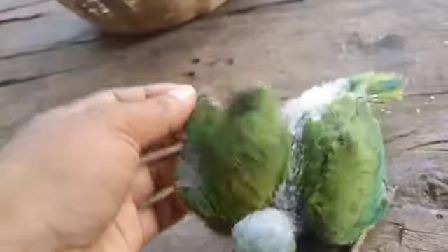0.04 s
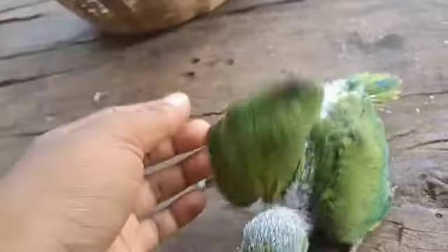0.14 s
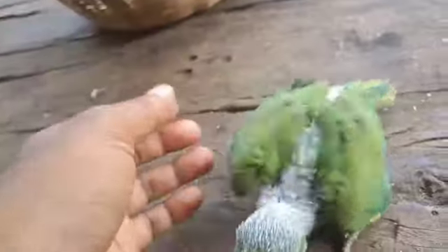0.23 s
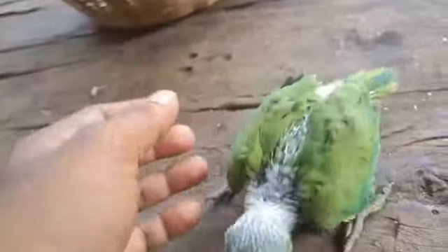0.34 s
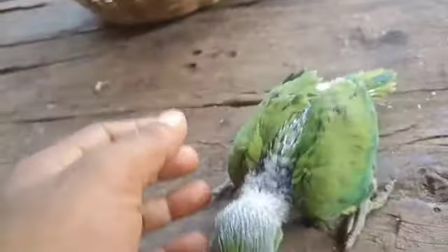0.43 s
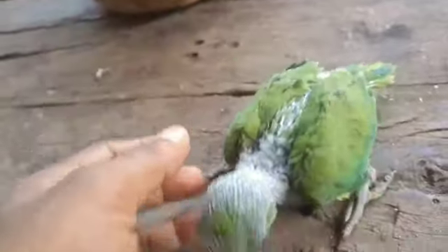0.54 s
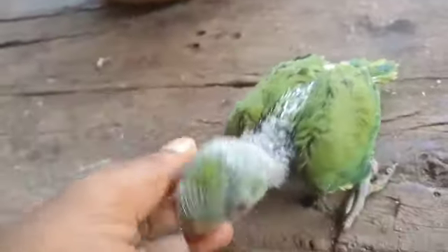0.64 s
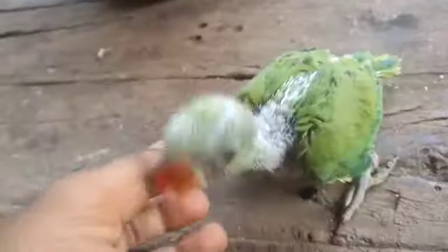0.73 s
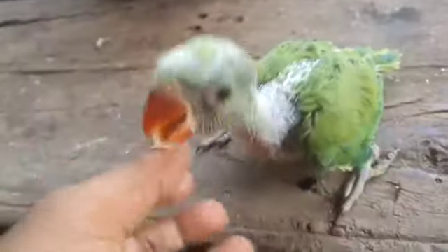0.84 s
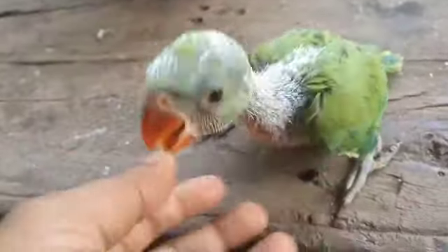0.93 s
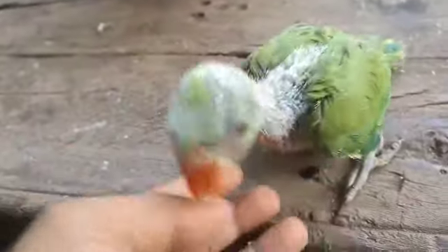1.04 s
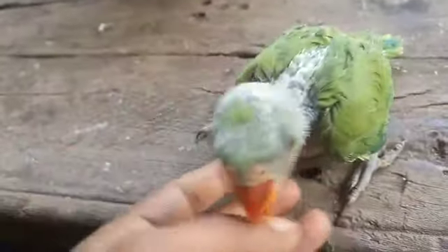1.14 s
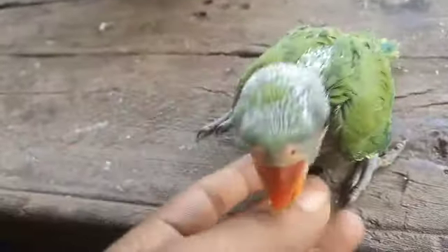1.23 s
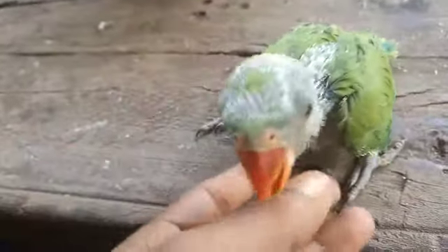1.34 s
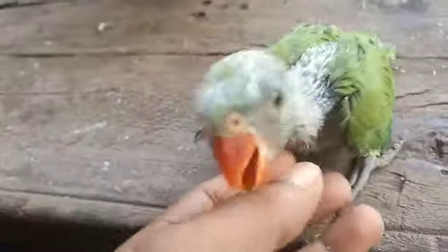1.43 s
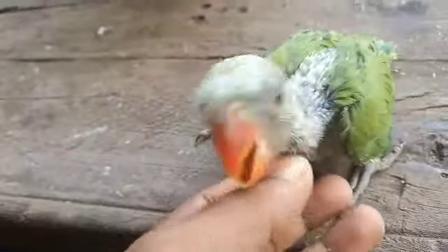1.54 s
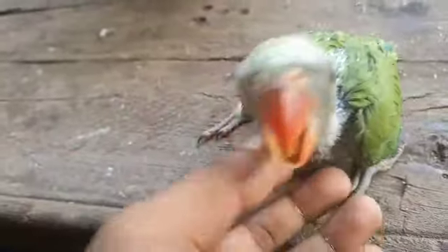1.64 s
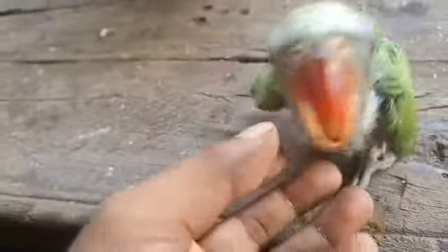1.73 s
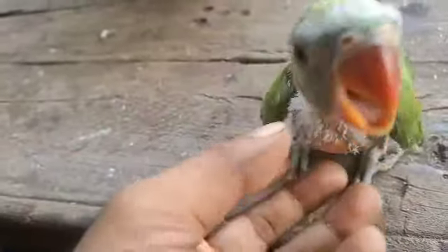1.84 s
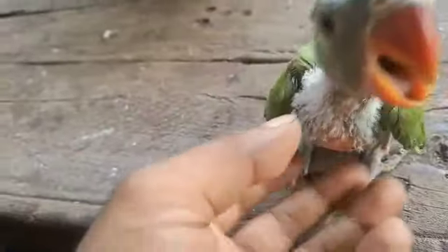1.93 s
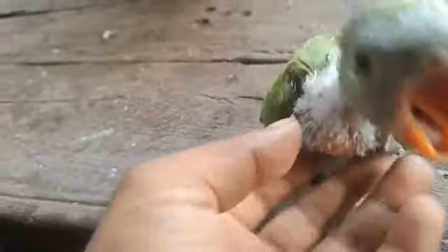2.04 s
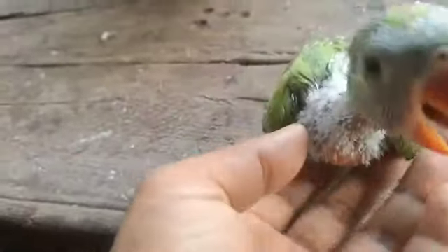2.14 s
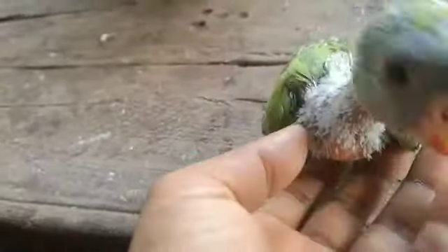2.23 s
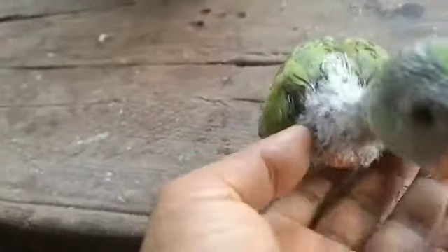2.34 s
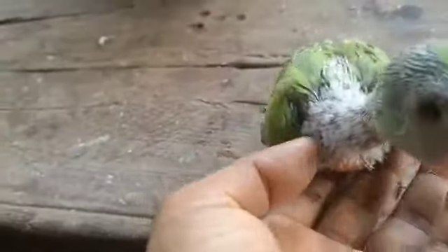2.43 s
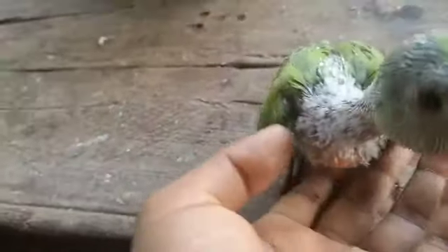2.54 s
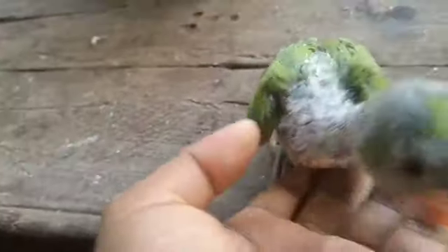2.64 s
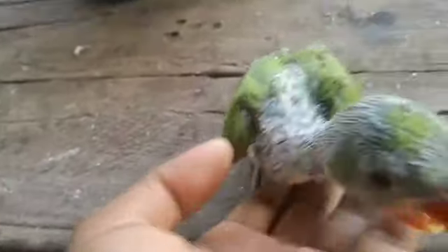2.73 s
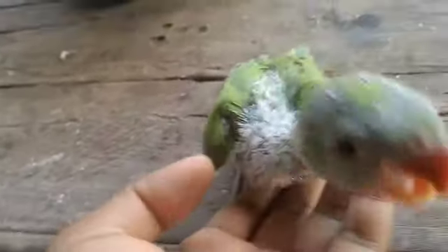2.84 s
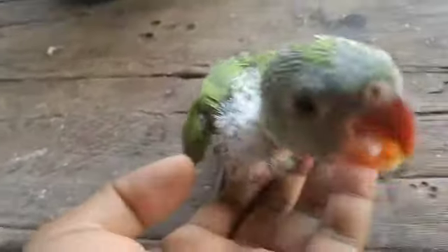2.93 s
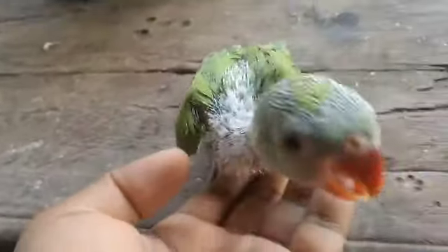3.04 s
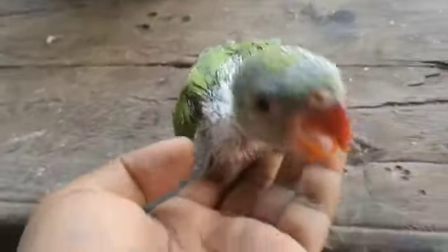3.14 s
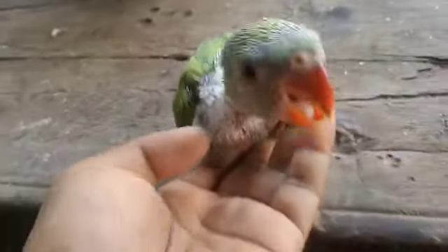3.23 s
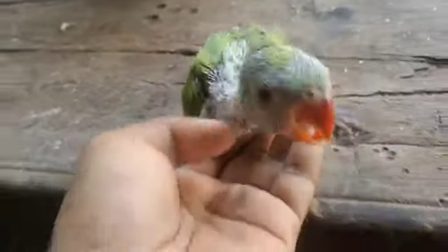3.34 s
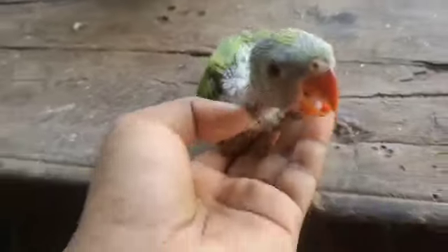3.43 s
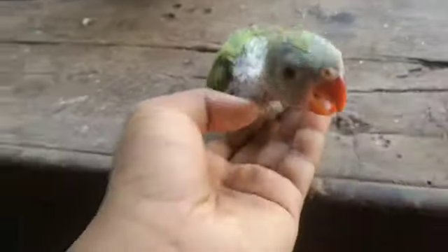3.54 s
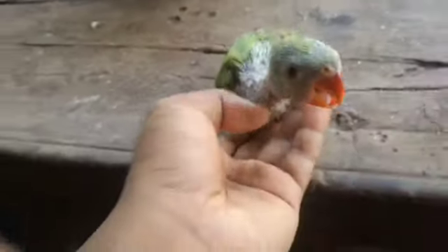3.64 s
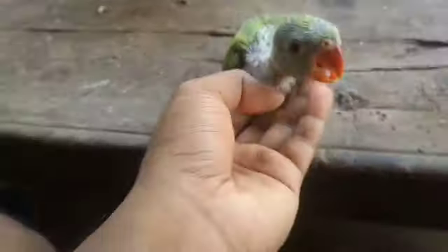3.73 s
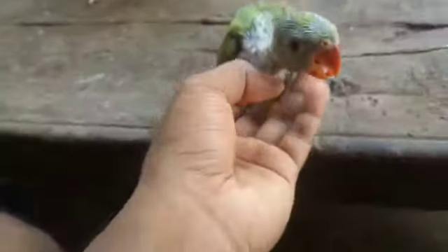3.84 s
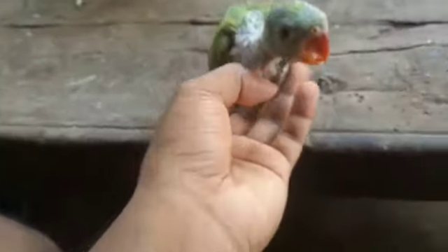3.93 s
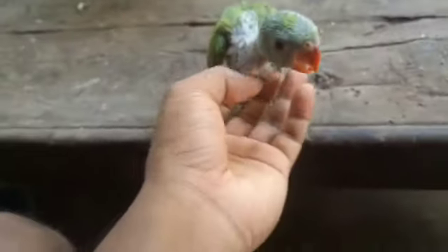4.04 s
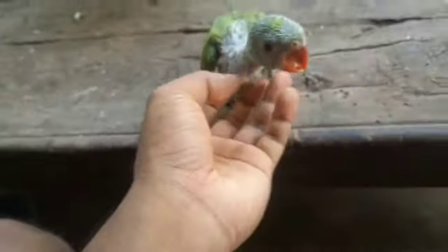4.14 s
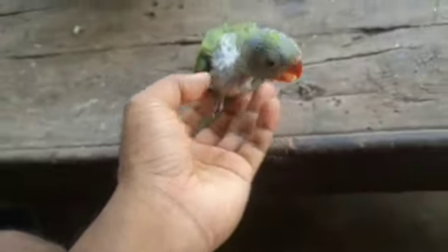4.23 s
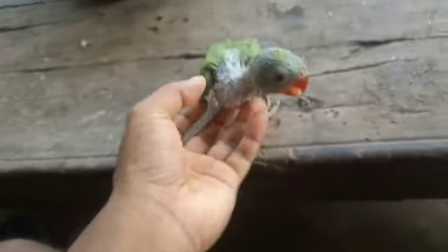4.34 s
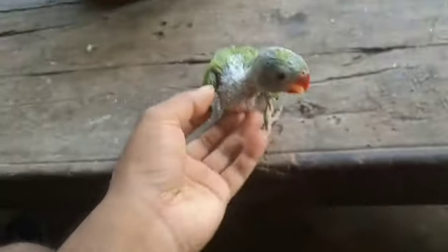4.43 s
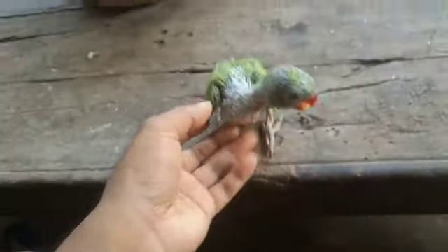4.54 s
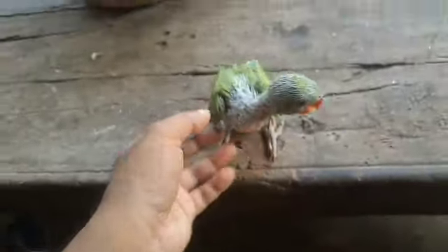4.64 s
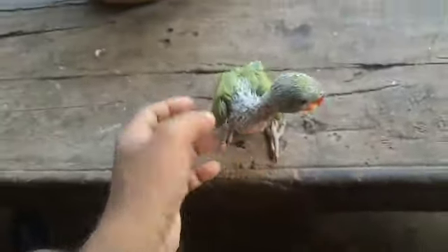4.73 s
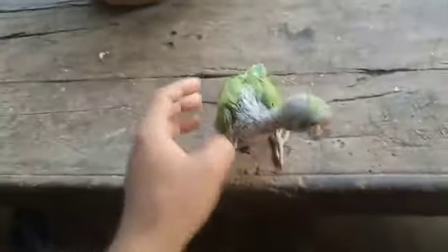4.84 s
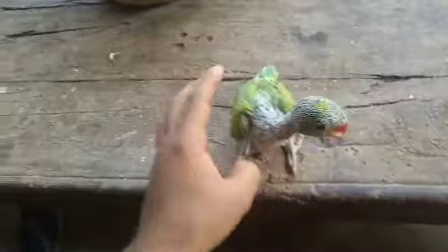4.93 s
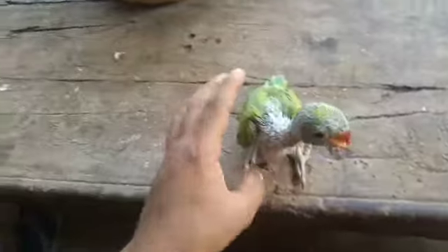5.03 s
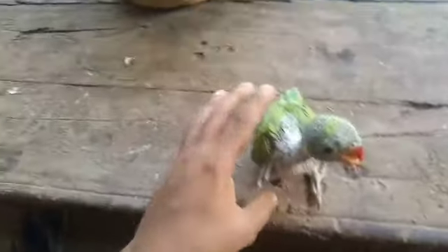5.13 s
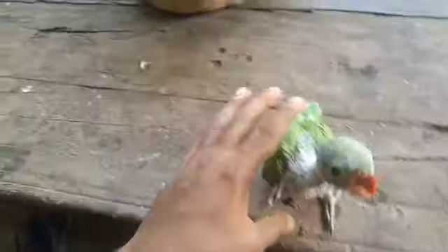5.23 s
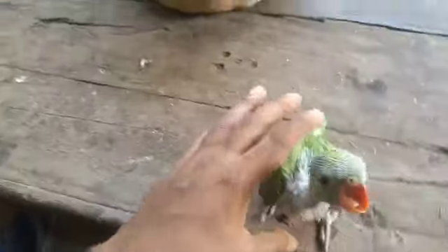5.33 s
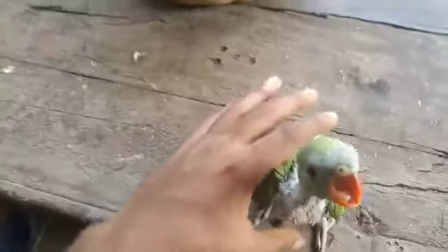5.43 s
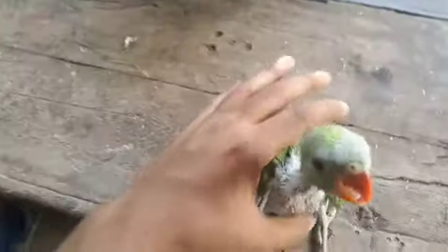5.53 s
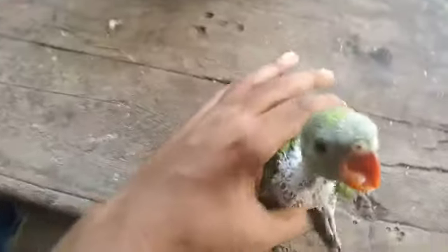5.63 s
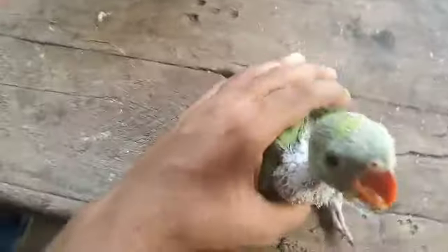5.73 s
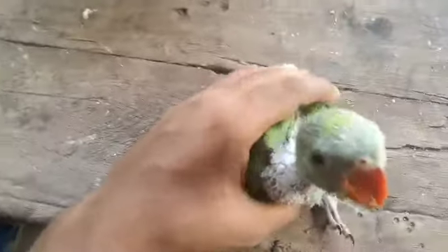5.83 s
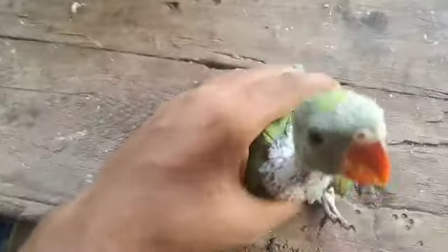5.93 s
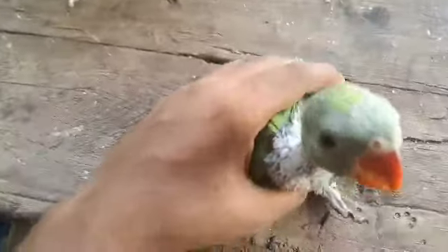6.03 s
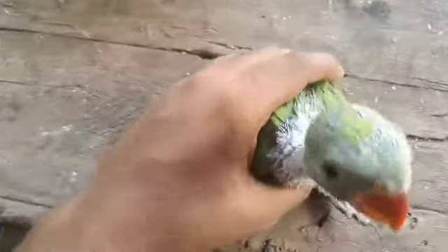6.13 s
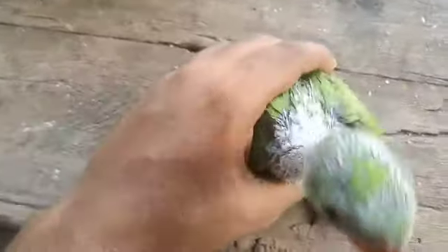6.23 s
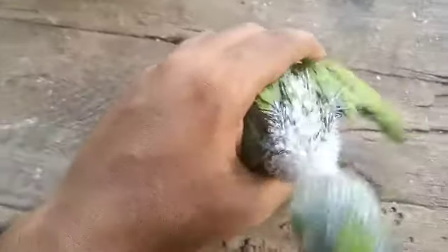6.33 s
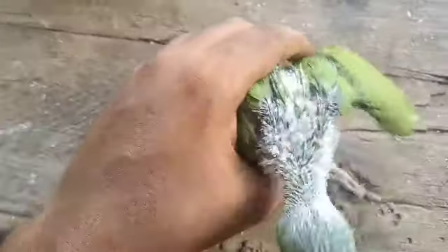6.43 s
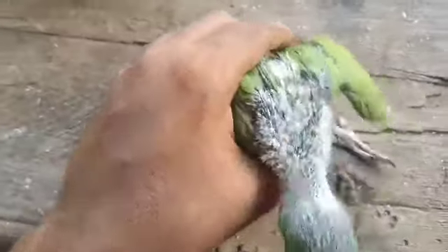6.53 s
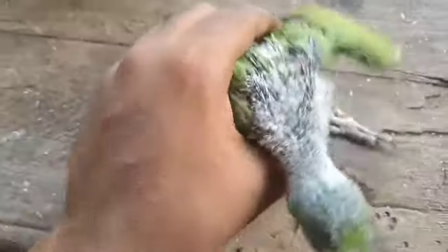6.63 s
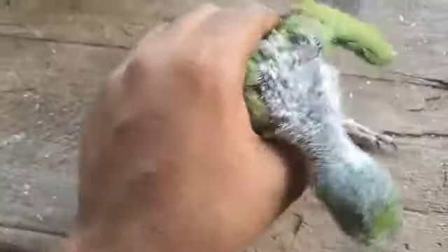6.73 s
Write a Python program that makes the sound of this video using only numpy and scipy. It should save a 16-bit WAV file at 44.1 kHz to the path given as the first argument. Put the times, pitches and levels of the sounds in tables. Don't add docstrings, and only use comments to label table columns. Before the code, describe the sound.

A quiet room with soft, slightly swelling air noise, very faint low mains hum and a distant thin insect hiss. At about 0.2 s a hand brushes feathers, a short dry rustle. At 0.67 s a tiny creak leads into a parrot chick's begging: short, harsh, reedy squawks of about 0.06 s, evenly spaced near eight per second, each arching quickly up to around 1.2 kHz and down again, with bright raspy overtones. They lean left and close, growing strongest around 2 to 3.3 s. From 3.5 s they recede, becoming weaker, hoarser and roomier through 5.1 s, slightly slower, then swell again, fuller and a little lower, until the last at 5.75 s. Short reflections from table and walls colour them. In the quiet after, faint dry claw ticks on wood cluster at 6.0 to 6.3 s, the last clearest; at 6.55 to 6.8 s feathers rustle with a slight breathy squeak.

```python
import sys
import numpy as np
from scipy import signal
from scipy.fft import rfft, irfft, next_fast_len
from scipy.io import wavfile
from scipy.ndimage import uniform_filter1d

SR = 44100
rng = np.random.default_rng(int(sys.argv[2]) if len(sys.argv) > 2 else 0)


def nominal_scale(level):
    x = np.asarray(level, float) / 20
    return 10 ** x


def generate_wav(sig):
    pcm = np.round(np.clip(np.atleast_2d(sig).T, -1, 1) * 32767).astype(np.int16)
    wavfile.write(sys.argv[1], SR, pcm)


N = 298557

# (time [s], length [s], top pitch [Hz], level [dB], beak towards ports [dB])
SQUAWKS = [(0.677, 0.066, 1313, -39, -5), (0.7982, 0.063, 1267, -36.5, 0.5),
           (0.9205, 0.06, 1223, -37, -4.5), (1.0455, 0.059, 1207, -36.5, -5),
           (1.168, 0.062, 1236, -36.5, -0.2), (1.2944, 0.058, 1239, -35.5, 1.3),
           (1.4123, 0.061, 1250, -35.5, 1), (1.5343, 0.063, 1230, -35, 0.3),
           (1.6589, 0.063, 1239, -35.5, 0), (1.7863, 0.064, 1209, -33.5, -4.5),
           (1.9118, 0.063, 1181, -33.5, -3), (2.0412, 0.061, 1176, -33, -3),
           (2.1697, 0.061, 1188, -32, -5.5), (2.2948, .0596, 1180, -32.5, -8),
           (2.426, 0.063, 1228, -32.5, -6), (2.554, 0.065, 1214, -32.5, -6.5),
           (2.685, 0.062, 1218, -33.5, -9), (2.8097, 0.063, 1267, -33.5, -5.5),
           (2.936, 0.06, 1254, -33.5, -4.5), (3.061, 0.064, 1233, -32.5, -5.5),
           (3.193, 0.064, 1251, -33, -3.5), (3.3227, .0624, 1245, -33.5, -3.5),
               (3.45, 0.062, 1260, -35.5, -4.5), (3.577, 0.061, 1260, -36.5, -5),
               (3.7078, .0616, 1266, -38, -4.5), (3.8393, 0.056, 1263, -38.5, -9.5),
               (3.9618, 0.057, 1276, -40.5, -7), (4.083, 0.057, 1190, -40.5, -5.5),
               (4.2094, .0589, 1290, -41, -4), (4.3395, .062, 1287, -42, -5.5),
               (4.4747, 0.066, 1286, -42.5, -19), (4.611, 0.068, 1307, -42, -11),
               (4.7478, 0.068, 1354, -43.5, -10.5), (4.8786, .0734, 1263, -42.5, -10.5),
               (5.0232, 0.069, 1293, -43.5, -5), (5.16, 0.062, 1227, -42, -9),
               (5.2968, 0.066, 1206, -39, -5.5), (5.4514, 0.066, 1208, -38.5, -6),
               (5.585, 0.07, 1176, -36.5, -5.5), (5.7474, 0.07, 1150, -36, -9.5)]
# (time [s], hoarseness [0-1], curvature of pitch fall [exponent], place of top [0-1],
# first pitch [Hz], last pitch [Hz])
VOICE_STATE = [(.68, .15, 2.6, .32, 900, 640), (.8, .45, 1.45, .49, 480, 640),
               (1.8, .3, 1.45, .41, 500, 570), (3.2, .52, 1.45, .38, 500, 560),
               (3.85, .6, 1.45, .365, 600, 570), (4.3, .88, 1.45, .34, 540, 570),
               (5.1, .92, 1.45, .325, 530, 570), (5.4, .45, 1.45, .39, 520, 560),
               (5.75, .3, 1.45, .37, 510, 550)]
# (time [s], left-right [dB], right lag [ms], neck strain [dB], gape [dB])
HEAD_MOTION = [(.68, 7, 0.17, -2.5, -5.5), (.8, 6, .18, 0, -1.5), (.92, 9, 0.25, 1.5, 3),
               (1.3, 7, .2, 0.7, 3.5), (1.5, 6.5, 0.21, -1, 3.5), (1.72, 7.5, 0.25, -1.8, 4),
               (1.92, 5, 0.19, -3, -0.5), (2.3, 3, .15, -3, 1), (2.68, 5.5, 0.082, -3.5, -0.8),
               (2.85, 4, 0.13, 0, -3), (3.3, 4, .21, 1.1, -1.4), (3.7, 5.3, 0.19, 3.5, -3.4),
               (3.95, 3.9, .23, 4, 0), (4.15, 2.2, 0.17, 5, -2.9), (4.6, -1.1, 0.23, 3.5, -4.2),
               (5.14, 1.3, .16, 4.5, -0.5), (5.45, 2.4, 0.082, -4.5, 7), (5.75, 3, .09, -8.5, 3.5)]
# (time [s], lowest throat resonance [Hz], its level [dB], highest throat resonance level [dB])
TONGUE_MOTION = [(.7, 3770, -2, -9), (1.0, 3680, -1, -9), (1.3, 3630, -9, -9), (1.7, 3560, -1.5, -8.5),
                 (2.2, 3420, 3, -10), (3.1, 3590, -3, -10), (3.8, 3810, -0.5, -8.5), (4.4, 3980, -0.5, -5),
                 (4.9, 3610, 2.5, -4.5), (5.3, 3340, 1.5, -14), (5.45, 3440, -3.5, -14),
                 (5.75, 3420, 1.5, -9)]
# (place [0-1], level [dB])
BREATH_EFFORT = [(0, -4), (.05, -5), (.2, -3.5), (.4, 0), (.6, -1.5), (.9, -2.5), (1, -3)]
PART_EFFORT_SHARE = [1.42, 0.17, 1.47, 3.18]
PART_LEVEL_DB = [-2.25, 3.5, 2.78, -0.3]
PART_PAN_DB = [.6, -1.5, -2.2, -1.2]
PART_LAG_SHARE = [0.34, 1.075, 1.231, 1.438]
TRACT_CUT_HZ = [1400, 2700, 6000]
# (resonance [Hz], width [Hz], level [dB])
WINDPIPE_MODES = [(1330, 386, 0), (1793, 357, 1.5), (2317, 517, 4.5)]
# (resonance [Hz], width [Hz], level [dB])
THROAT_MODES = [(3680, 347, 2), (4080, 525, -2), (5510, 715, -6), (6190, 685, -11.5)]
# (resonance [Hz], width [Hz], level [dB])
BEAK_MODES = [(7230, 1000, 0.5), (9930, 970, 3), (10690, 830, 0), (13900, 1860, -4)]
# (time [s], level [dB])
CREAK_PULSES = [(0.666, -34), (.67, -34), (0.6732, -27)]
# (delay [ms], level [dB])
NEAR_ECHOES = [(.5, -14), (1.3, -13), (2.4, -16), (4.6, -19), (7.3, -20), (10.9, -21), (15.4, -23),
               (21, -25)]
# (time [s], level [dB])
ROOM_GAIN = [(.7, 0.5), (1.5, -4.5), (2.5, -1.5), (3.5, -2), (4.3, 4.5), (5.1, 5.5), (5.8, 1)]
# (start [s], loudest at [s], end [s], peak level [dB])
FEATHER_STROKES = [
    (0.167, 0.252, 0.43, -52.5),
    (6.546, 6.606, 6.8, -56),
]
# (frequency [Hz], density [dB per Hz])
FEATHER_SPECTRUM = [(590, -46), (1000, -22), (1380, -12), (1730, -14), (2080, -5.5), (10500, -14.5),
                    (15500, -17)]
# (resonance [Hz], width [Hz], level [dB])
WHEEZE_MODES = [(1750, 250, 0), (2890, 200, -7)]
# (time [s], level [dB])
WHEEZE_LEVEL = [(6.56, -100), (6.6, -58), (6.72, -61), (6.77, -72)]
# (time [s], peak level [dB])
CLAW_TICKS = [(6.03, -54), (6.155, -54), (6.187, -50), (6.212, -53), (6.228, -49), (6.293, -43)]
# (frequency [Hz], density [dB per Hz])
AIR_SPECTRUM = [(12, -44), (20, -17), (48, -0.5), (77, -3.5), (172, 0), (347, -3), (434, -12.5),
                (574, -6.5), (1440, -16.5), (1660, -12), (5080, -22.5), (6010, -22), (6720, -21),
                (14700, -25.5), (16000, -50)]
# (time [s], level [dB])
AIR_SWELL = [(0.0, -65.5), (1.11, -63), (1.94, -62), (2.39, -59.5), (3.86, -61.5), (4.15, -60), (4.73, -62),
             (5.62, -59), (6.45, -65.5), (6.77, -63)]
# (frequency [Hz], left-right likeness [-1 to 1])
PORT_LIKENESS = [(60, 0.66), (180, 0.96), (550, 0.69), (1650, 0.12), (4970, 0.33), (15000, 0.055)]
# (frequency [Hz], left-right balance [dB])
PORT_BALANCE = [(60, 4.5), (180, 1.5), (550, 3), (1650, -2.5), (4970, -5.5), (15000, -1.5)]
# (resonance [Hz], width [Hz], level [dB])
INSECT_MODES = [(5850, 500, 0)]
# (frequency [Hz], level [dB rms])
HUM_LINES = [(100, -68.5), (200, -76)]

LOWEST_HZ = 550
PUSH_DB, PUSH_PER_STRAIN = 1.24, 0.89
EVEN_PER_STRAIN = 0.39
BODY_CUT_HZ = 480
SHADOW_HZ, FACING_DB, SHADOW_SHARE = 11000, -35, .1
ECHO_CUT_HZ = 1600
ROOM_T60_S, ROOM_DB, WALL_CUT_HZ, ROOM_LOW_CUT_HZ = .32, -22, 9000, 1400
STROKE_START_DB, STROKE_FADE_DB_PER_S = -5.5, 73
INSECTS_DB = -74
PORT_CUT_HZ = 12600


def chick():
    out = np.zeros((2, N))
    squawks = SQUAWKS
    sway = np.cumsum(rng.standard_normal((len(squawks), 2, len(NEAR_ECHOES))), axis=0)
    for (start_s, length_s, top_hz, level_db, beak_db), pose in zip(squawks, sway):
        hoarse, curve, crest, first_hz, last_hz = at_time(VOICE_STATE, start_s)
        pan_db, lag_ms, strain_db, gape_db = at_time(HEAD_MOTION, start_s)
        tongue_hz, low_db, high_db = at_time(TONGUE_MOTION, start_s)
        lowest = (tongue_hz, THROAT_MODES[0][1], low_db)
        highest = (*THROAT_MODES[3][:2], high_db)
        throat = [lowest, *THROAT_MODES[1:3], highest]
        parts_db = PART_LEVEL_DB + np.array([0, strain_db, gape_db, beak_db]) + level_db
        parts = squawk(length_s, first_hz, top_hz, crest, last_hz, hoarse, curve, strain_db, throat)

        size = next_fast_len(parts.shape[1] + 1200)
        at = round((start_s + .0002) * SR)
        hz = np.arange(size // 2 + 1) * SR / size
        phase_per_ms = -2j * np.pi * hz / 1000
        above = 1 / (1 + (SHADOW_HZ / np.maximum(hz, 1)) ** 16)
        treble = 1 / (1 + (ECHO_CUT_HZ / np.maximum(hz, 1)) ** 4)
        shadow_db = SHADOW_SHARE * min(parts_db[3] - FACING_DB, 0) * above
        spectra = rfft(parts, size) * nominal_scale(shadow_db)
        for port, side in enumerate((1, -1)):
            gains = nominal_scale(parts_db + side * (pan_db + np.array(PART_PAN_DB)) / 2)
            lags_ms = port * lag_ms * np.array(PART_LAG_SHARE)
            direct = gains @ (spectra * np.exp(np.outer(lags_ms, phase_per_ms)))
            echoes = 0
            for (delay_ms, echo_db), turn in zip(NEAR_ECHOES, pose[port]):
                moved_ms = delay_ms * (1 + 0.19 * np.sin(0.441 * turn))
                echoes = echoes + nominal_scale(echo_db) * np.exp(moved_ms * phase_per_ms)
            heard = direct * (1 + treble * echoes) * nominal_scale(1.3 * side * pan_db * above)
            out[port, at:at + size] += irfft(heard, size)
    return signal.sosfilt(butter(4, BODY_CUT_HZ, "high"), out + creaks())


def squawk(length_s, first_hz, top_hz, crest, last_hz, hoarse, curve, strain_db, throat):
    n = round((length_s - .0035) * SR)
    chance = rng.standard_normal((3, 5000))
    place = np.arange(n) / n
    rise = (top_hz - first_hz) * np.abs(1 - place / crest) ** 1.7
    fall = (top_hz - max(last_hz, LOWEST_HZ)) * np.abs((place - crest) / (1 - crest)) ** curve
    pitch = top_hz - np.where(place < crest, rise, fall)

    slack = (1 - pitch / top_hz) ** 1.5 * 2.5
    cycle = np.cumsum(pitch / SR).astype(int)
    wobble = .02 * hoarse * (.7 + 4 * slack) * chance[0, cycle]
    phase = np.cumsum(pitch * (1 + wobble) / SR)
    cycle = phase.astype(int)
    shimmer_db = (2 * hoarse + 2 * slack) * np.clip(chance[1, cycle], -2, 1.5)
    alternate_db = 5 * slack * (-1.) ** cycle
    strength = nominal_scale(shimmer_db - alternate_db)

    closing = np.interp(np.arange(1, cycle[-1] + 1), phase, np.arange(n))
    fine = np.zeros(4 * n)
    fine[np.round(closing * 4).astype(int)] = 4
    pulses = signal.resample_poly(fine, 1, 4) * strength
    burst = np.exp(-2 * (phase % 1)) * np.sqrt(pitch / SR) * (phase > 1)
    puffs = hoarse * (1 + 2.8 * slack) * chance[2, :n] * burst

    push_db = (PUSH_DB + PUSH_PER_STRAIN * strain_db) * (place - .5)
    effort_db = np.interp(place, *np.transpose(BREATH_EFFORT)) + push_db
    shares = np.array(PART_EFFORT_SHARE)
    shares[0] -= EVEN_PER_STRAIN * max(strain_db, 0)
    fade = np.minimum(1, np.minimum(place, 1 - place) / .03)
    fundamental = np.sin(2 * np.pi * phase) * fade * uniform_filter1d(strength, size=40) ** 0.48
    sources = [fundamental] + [pulses + puffs] * 3
    parts = np.array([np.pad(p * nominal_scale(share * effort_db), (0, 500)) for p, share in zip(sources, shares)])
    parts[1:, n + round(70 + 20 * chance[0, -1])] = nominal_scale(-9 + 3 * chance[1, -1])
    tracts = (WINDPIPE_MODES, throat, BEAK_MODES)
    parts[1:] = [tract(*part) for part in zip(parts[1:], tracts, TRACT_CUT_HZ)]
    parts = np.array([rms_one(p) * np.sqrt(n / len(p)) for p in parts])
    return parts * [[1], [1], [-1], [-1]]


def tract(source, modes, cut_hz):
    return resonances(signal.sosfilt(butter(4, cut_hz, "high"), source), modes, spread_db=1.2)


def creaks():
    pulses = np.zeros(N)
    for time_s, level_db in CREAK_PULSES:
        pulses[round(time_s * SR)] = nominal_scale(level_db)
    modes = [(885, 660, 0.023)] + WINDPIPE_MODES + THROAT_MODES + BEAK_MODES
    return resonances(pulses, modes) * nominal_scale(9.5)


def room(x):
    size = next_fast_len(N + SR)
    hz = np.arange(size // 2 + 1) * SR / size
    t60_s = ROOM_T60_S / (1 + (hz / WALL_CUT_HZ) ** 2)
    low_cut = hz / np.hypot(hz, ROOM_LOW_CUT_HZ)
    spectrum = rfft(x, size)
    lags_s = rng.uniform(.004, 0.062, (2, 16))
    smears_s = rng.uniform(0.00058, 0.0065, (2, 4))
    out = []
    for port_lags_s, port_smears_s in zip(lags_s, smears_s):
        answer = 0
        for k, lag_s in enumerate(port_lags_s):
            loop = 10 ** (-3 * lag_s / t60_s) * np.exp(-2j * np.pi * hz * lag_s)
            answer = answer + (-1) ** k * loop / (1 - loop)
        for lag_s in port_smears_s:
            late = np.exp(-2j * np.pi * hz * lag_s)
            answer = answer * (late - .6) / (1 - .6 * late)
        out.append(irfft(spectrum * answer * low_cut, size)[:N])
    return np.array(out)


def feathers():
    edge_s, level = .012, 0
    for start_s, crest_s, end_s, peak_db in FEATHER_STROKES:
        end_db = peak_db - STROKE_FADE_DB_PER_S * (end_s - crest_s)
        contour = [(start_s - edge_s, -110), (start_s, peak_db + STROKE_START_DB), (crest_s, peak_db),
                   (end_s, end_db), (end_s + edge_s, -110)]
        level = level + nominal_scale(in_time(contour))
    return level * banded_noise(FEATHER_SPECTRUM, patchy_db=1.5, low_hz=900)


def wheeze():
    return nominal_scale(in_time(WHEEZE_LEVEL)) * rms_one(resonances(rng.standard_normal((2, N)), WHEEZE_MODES))


def claws():
    out = np.zeros((2, N))
    decay = np.exp(-np.arange(900) / SR / .003)
    for time_s, peak_db in CLAW_TICKS:
        at = round(time_s * SR)
        out[:, at:at + 900] += nominal_scale(peak_db - 4) * rng.standard_normal((2, 900)) * decay
    return signal.sosfilt(butter(2, [1800, 8000], "band"), out)


def air():
    return nominal_scale(in_time(AIR_SWELL) + 4) * banded_noise(AIR_SPECTRUM, patchy_db=.8, low_hz=20)


def insects():
    chorus = resonances(resonances(rng.standard_normal((2, N)), INSECT_MODES), INSECT_MODES)
    return nominal_scale(INSECTS_DB + 1.4 * drift(11) + [[-2], [2]]) * rms_one(chorus)


def hum():
    t, out = np.arange(N) / SR, 0
    for hz, level_db in HUM_LINES:
        level = nominal_scale(level_db + 3 + 2 * drift(6))
        out = out + level * np.sin(2 * np.pi * hz * t + .8 * drift(5))
    return out * nominal_scale([[1.5], [-1.5]])


def banded_noise(spectrum, patchy_db, low_hz):
    out, together = 0, drift(6.6)
    edges_hz = low_hz * 2 ** np.arange(0, np.log2(17000 / low_hz), 1 / 3)
    white = rng.standard_normal((2, 2, N))
    opposite = np.array([[1], [-1]])
    for k, (low, high) in enumerate(zip(edges_hz, edges_hz[1:])):
        mid, side = signal.sosfilt(butter(2, [low, high], "band"), white[k % 2])
        hz = np.sqrt(low * high)
        alike = np.clip(at_hz(PORT_LIKENESS, hz), -1, 1)
        gain = nominal_scale(at_hz(spectrum, hz) + patchy_db * (.4 * together + drift(12)))
        lean = nominal_scale(at_hz(PORT_BALANCE, hz) / 2 * opposite)
        out = out + gain * lean * (np.sqrt(1 + alike) * mid + np.sqrt(1 - alike) * side * opposite)
    return rms_one(out)


def resonances(x, modes, spread_db=0):
    out = 0
    for k, (hz, width_hz, level_db) in enumerate(modes):
        r = np.exp(-np.pi * width_hz / SR)
        poles = [1, -2 * r * np.cos(2 * np.pi * hz / SR), r * r]
        gain = (-1) ** k * nominal_scale(level_db + spread_db * rng.standard_normal())
        out = out + gain * signal.lfilter([(1 - r * r) / 2, 0, (r * r - 1) / 2], poles, x)
    return out


def drift(rate_hz):
    r = np.exp(-80 * np.pi * rate_hz / SR)
    slow = signal.lfilter([1], [1, -2 * r, r * r], rng.standard_normal(N // 40 + 2002))[2000:]
    return np.interp(np.arange(N) / 40, np.arange(len(slow)), rms_one(slow))


def butter(order, cut_hz, kind="low"):
    return signal.butter(order, cut_hz, kind, fs=SR, output="sos")


def rms_one(x):
    return x / np.sqrt(np.mean(x ** 2) + 1e-20)


def in_time(rows):
    return np.interp(np.arange(N) / SR, *np.transpose(rows))


def at_time(rows, time_s):
    times_s, *columns = np.transpose(rows)
    return [np.interp(time_s, times_s, c) for c in columns]


def at_hz(points, hz):
    points_hz, values = np.transpose(points)
    return np.interp(np.log(hz), np.log(points_hz), values)


def scene():
    voice = chick()
    wet = nominal_scale(ROOM_DB) * room(voice.mean(axis=0) * nominal_scale(in_time(ROOM_GAIN)))
    handling = feathers() + wheeze() + claws()
    return voice + wet + handling + air() + insects() + hum()


def low_pass(x):
    return signal.sosfilt(signal.butter(12, 16490, fs=SR, output="sos"), x)


def record(dry):
    dull = signal.sosfilt(butter(6, PORT_CUT_HZ), dry)
    return low_pass(dull)


dry = scene()
out = record(dry)
generate_wav(out)
```